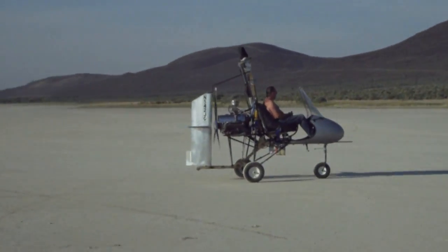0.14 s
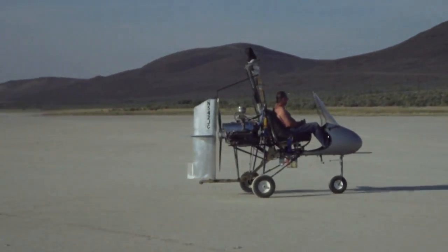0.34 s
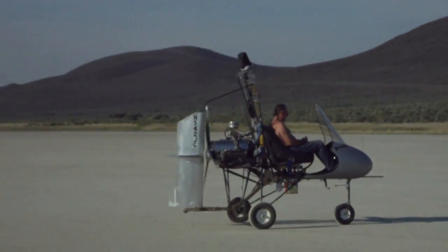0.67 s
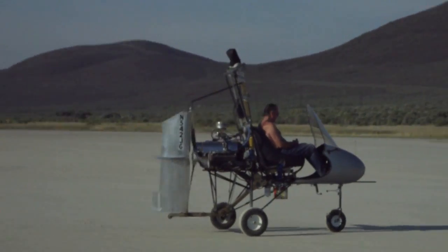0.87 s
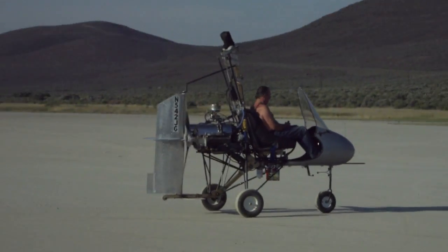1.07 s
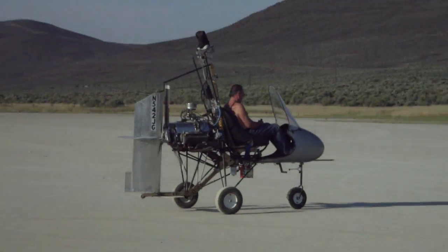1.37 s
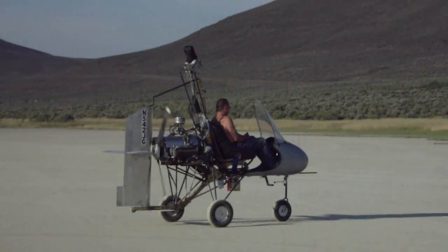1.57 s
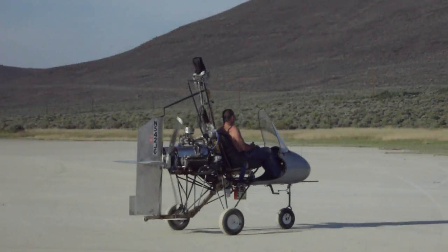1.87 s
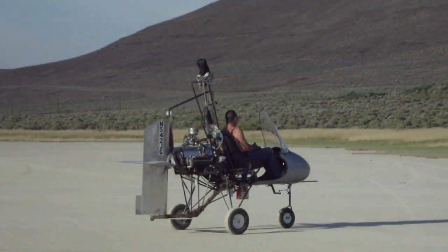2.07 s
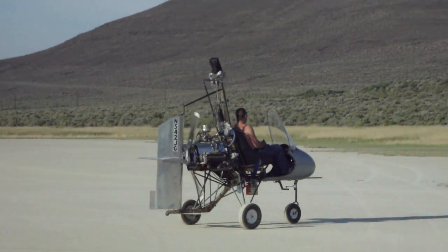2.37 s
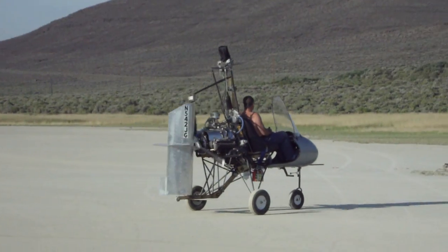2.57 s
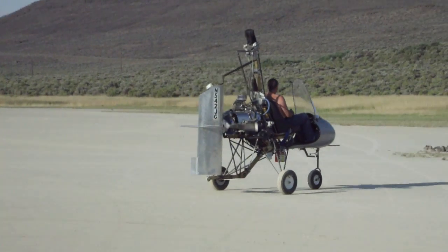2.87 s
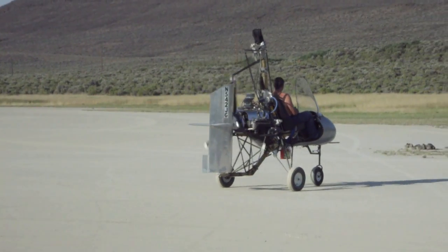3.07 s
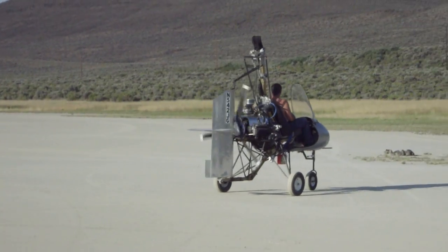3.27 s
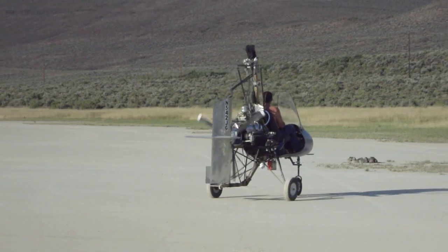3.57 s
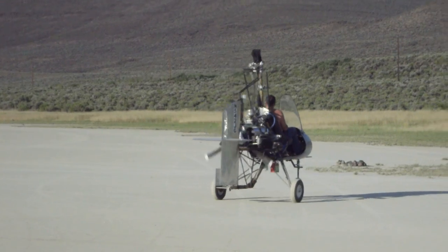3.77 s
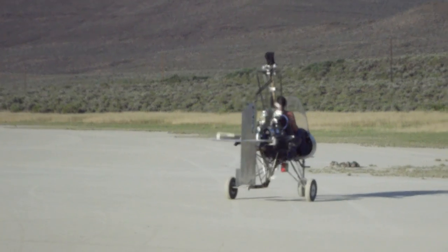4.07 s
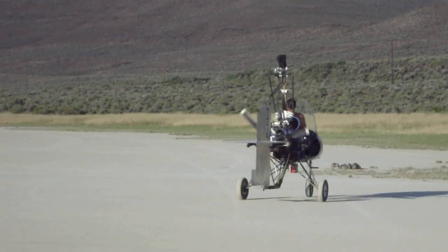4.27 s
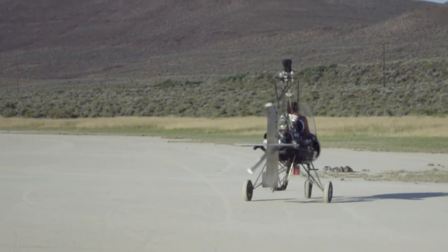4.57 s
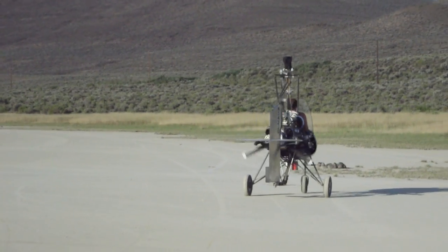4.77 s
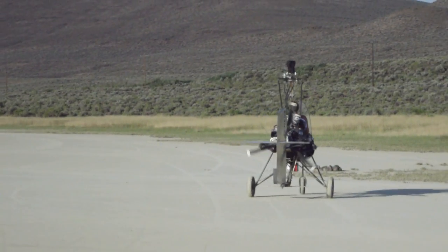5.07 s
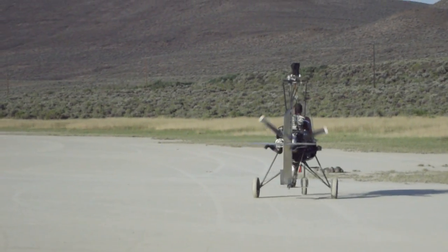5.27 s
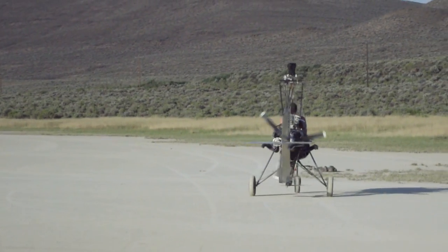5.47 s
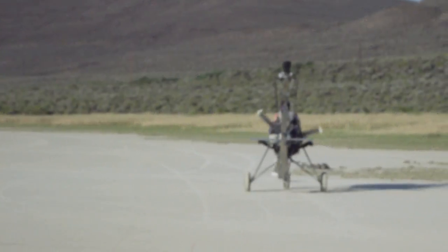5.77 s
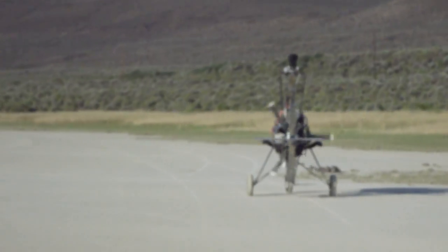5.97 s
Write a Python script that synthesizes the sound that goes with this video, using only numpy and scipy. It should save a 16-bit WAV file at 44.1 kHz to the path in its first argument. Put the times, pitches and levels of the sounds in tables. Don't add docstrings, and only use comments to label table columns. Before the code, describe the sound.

Harsh clattering propeller-engine burst with camera motor rasp, throttle cut to a stumbling putter, then smoother droning power and a final zoom whirr.

```python
import sys
import numpy as np
from scipy import signal
from scipy.fft import rfft, irfft
from scipy.io import wavfile
from scipy.ndimage import uniform_filter1d

SR = 44100
rng = np.random.default_rng(int(sys.argv[2]) if len(sys.argv) > 2 else 0)


def linear_from_db(decibels):
    return 10 ** (np.asarray(decibels, float) / 20)


def generate_wav(sig):
    pcm = np.round(np.clip(np.atleast_2d(sig).T, -1, 1) * 32767).astype(np.int16)
    wavfile.write(sys.argv[1], SR, pcm)


N = 270333
T = np.arange(N) / SR
HZ = np.arange(N // 2 + 1) * SR / N

# time [s], rate [Hz].
CYCLE_RATE = [(0.0, 23.17), (0.19, 26.89), (0.56, 32.87), (0.87, 34.33), (1.19, 33.98), (1.86, 31.08),
              (2.03, 25.77), (2.45, 19.34), (2.65, 17.96), (3.0, 17.38), (3.3, 18.25), (3.87, 18.6),
              (4.32, 17.9), (4.51, 17.91), (4.8, 20.36), (5.27, 22.08), (6.13, 22.33)]
# multiple of the cycle rate, level under power, idling, pulling away [dB].
EXHAUST_ORDERS = [(1, -30, -55, -57), (6, -23, -30, -25), (7, -26, -30, -46), (8, -24, -38, -29),
                  (9, -35, -37, -51), (10, -29, -44, -43), (11, -34, -49, -53), (12, -31, -43, -38),
                  (13, -36, -48, -51), (14, -38, -41, -38), (16, -38, -48, -42), (18, -38, -47, -42),
                  (20, -31, -49, -42), (22, -35, -48, -49), (24, -31, -48, -47), (26, -32, -54, -56),
                  (28, -33, -57, -55), (30, -34, -59, -53), (32, -37, -59, -55)]
# multiple of the cycle rate, level spooling up, under power, idling, pulling away [dB].
LUMPY_ORDERS = [
    (2, -21, -13, -34, -41),
    (3, -19, -13, -38.5, -41),
    (5, -42, -31, -24.5, -40),
]
# frequency [Hz], level [dB].
PIPE_RING = [(15, -22), (40, -7), (70, 2), (100, 4), (140, -5.5), (250, -32.0), (450, -10.5), (700, -56.0)]
# frequency [Hz], level [dB per Hz].
CRACK_COLOUR = [(120, -15.5), (200, -6), (270, -1.5), (297, -7), (335, -3.5), (503, -16.5), (799, -2.5),
                (1230, -12), (1770, -2.5), (2600, -24), (3380, -20.5), (5720, -120)]
# time [s], peak [dB], treble against the peak [dB].
STRONG_CHUFFS = [(2.1381, 2, -25), (2.2244, 3, -28), (2.3152, -1, -21), (2.4135, -0.5, -22),
                 (2.4644, 3, -15), (2.5158, -3.5, -11.5), (2.5706, -1.5, -23), (2.623, -3, -9.5),
                 (2.7333, -4.5, -14.5), (2.848, -5.5, -18.5), (2.9064, -3, -22.5), (3.0201, -6.5, -19),
                 (3.0755, -10.5, -13), (3.3539, -4, -16.5), (3.4082, -1.5, -14.5), (3.4641, -3.5, -15),
                 (3.5185, -1.5, -17), (3.5719, -7.5, -14), (3.6262, -7, -15), (3.8971, -9, -14),
                 (4.0608, -7, -16), (4.5077, -4.5, -23.5), (4.5596, -6.5, -16.5), (4.7158, -12, -4.5),
                 (4.8175, -13, -10), (4.8659, -13.5, -3), (4.9627, -2.5, -19), (5.0086, -4, -16),
                 (5.1498, -8, -16.5)]
# centre [Hz], width [Hz], level [dB], 1 if in the treble group.
CHUFF_BANDS = [(1730, 115, -6, 0), (2440, 240, 1, 0), (2984, 194, 4.5, 0), (3960, 640, -13.5, 0),
               (6430, 490, -14.5, 1), (7330, 410, -8.5, 1), (8540, 560, -5, 1), (9210, 610, -10, 1)]
# time [s], level [dB].
LEAK_LEVEL = [(0, -20), (.5, -22), (.8, -26), (1.84, -26.5), (1.95, -41.5), (2.3, -33), (2.8, -28),
              (4.2, -32), (5.0, -28), (5.15, -28.5), (5.6, -38.5), (6.13, -36.5)]
# frequency [Hz], level [dB per Hz].
HISS_COLOUR = [(88, -8), (150, 0.5), (214, -11.5), (396, -9.5), (554, -20.5), (733, -15.5), (1190, -20),
               (1610, -10), (3030, -8.5), (4090, -36), (5510, -32), (7290, -28), (8780, -21.5),
               (13000, -48)]
# frequency [Hz], level [dB].
PORT_DIFFERENCE = [(300, -48), (700, -28), (1400, -20), (2500, -19), (5000, -16), (9000, -14), (15000, -12)]
# frequency [Hz], lead [radians].
PORT_LEAD = [(1, 0), (1200, 0), (2000, 0.19), (3100, 0.42), (3900, -0.03), (5700, 1.1), (6600, -1.2),
             (9000, -1.1), (14000, -4.5)]
# frequency [Hz], level [dB per Hz].
WIND_COLOUR = [(10, -10), (25, -6), (45, -5.5), (80, -23), (200, -43)]
# start [s], end [s], rise [s], fall [s], level [dB].
ZOOM_MOTOR = [
    (-.1, .84, .01, .04, -21),
    (5.775, 6.3, .004, .04, -20.5),
]
# frequency [Hz], level [dB per Hz].
ZOOM_COLOUR = [(760, -20), (1300, -15.5), (1570, -8.5), (2210, -24), (2470, -0.5), (2800, 0.5),
               (3100, -6.5), (3530, -39), (4800, -23.5), (6000, -40), (7800, -64), (13200, -120)]
# time [s], peak [dB].
GEAR_KNOCKS = [
    (5.7728, -9),
    (5.7783, -5.5),
    (5.7837, -5),
]
# start [s], length [s], pitch [Hz], level [dB], third harmonic [dB].
FOCUS_WHINES = [
    (.36, .13, 2650, -29, -50),
    (4.02, .13, 2645, -30, -52),
    (5.622, .065, 2652, -31, -44),
]
# frequency [Hz], level [dB], lead of the right side [radians], flutter [dB].
WHISTLES = [
    (7436, -46.5, 1.0, .5),
    (14874, -46, 2.15, 2.2),
]
# frequency [Hz], level [dB].
AMPLIFIER_COLOUR = [(3000, -28), (9000, -1), (13000, -6), (14500, -4), (15500, -24)]

SPOOL_S, CUT_S, CUT_FADE_S, PULL_S, PULL_RISE_S = 0.35, 1.83, .2, 4.5, 0.34
RUMBLE_DB = (-28, -34.5, -34.5, -34)
CRACK_DB = (-20, -13.5, -26, -21.5)
HISS_DB = (-18.5, -18, -26.5, -26)
SECOND_DB = (-1.5, -3, -9, -3.5)
BARK_DB = (-15, -0.5, -6.5, -4)
PLACE = (0.403, 0.31, 0.48, 0.52)


def curves(table):
    s, *columns = np.transpose(table)
    return [np.interp(T, s, c) for c in columns]


def shape(points):
    hz, db = np.transpose(points)
    return linear_from_db(np.interp(np.log(HZ + 1), np.log(hz), db))


def colour(x, points):
    y = irfft(rfft(x) * shape(points), N)
    return y / np.sqrt(np.mean(y ** 2))


def air():
    mid, side = rng.standard_normal((2, N))
    side = irfft(rfft(side) * shape(PORT_DIFFERENCE), N)
    return np.array([mid + side, mid - side])


def walk(rate):
    k = int(SR / rate)
    held = np.repeat(rng.standard_normal(N // k + 1), k)
    return 1.26 * uniform_filter1d(uniform_filter1d(held, k), k)[:N]


def steady(gate):
    return gate / np.sqrt(uniform_filter1d(gate ** 2, size=SR // 4) + 1e-9)


def ramp(start, end, rise_s, fall_s):
    return np.clip(np.minimum((T - start) / rise_s, (end - T) / fall_s), 0, 1)


def throttle(fade_s, lag_s=0.):
    opened = np.exp(-np.maximum(T - CUT_S - lag_s, 0) / fade_s)
    spool = np.exp(-(T / SPOOL_S) ** 2)
    pull = (1 - opened) * np.clip((T - PULL_S) / PULL_RISE_S, 0, 1)
    return np.array([spool * opened, (1 - spool) * opened, 1 - opened - pull, pull])


def by_state(values, fade_s=CUT_FADE_S, lag_s=0.):
    return np.asarray(values, float) @ throttle(fade_s, lag_s)


def exhaust(cycle, power, pull, bark_db):
    idle = np.clip(1 - power - pull, 0, 1)
    low, rumble_db = low_orders(np.gradient(cycle) * SR)
    thump = .59 * idle + .615 * pull + .46 * power
    waver = .04 + .14 * idle
    out = 0
    for k, gain in enumerate(low, 2):
        phase = 2 * np.pi * k * (cycle - thump) + waver * walk(12)
        out = out + gain * (1 + waver * walk(15)) * np.cos(phase)
    start = np.where(power > .5, .035, .6 + .038 * pull)
    for k, power_db, idle_db, pull_db in EXHAUST_ORDERS:
        k = round(k)
        sign = -1 if k == 6 else 1
        gain = power * linear_from_db(power_db + bark_db * min(k / 20, 1))
        gain = gain + sign * idle * linear_from_db(idle_db) + pull * linear_from_db(pull_db)
        drift = (waver + .012 * k) * walk(10)
        phase = 2 * np.pi * k * (cycle - start) + drift
        out = out + gain * (1 + 2 * waver * walk(12)) * np.cos(phase)
    firing = np.floor(4 * cycle - .4).astype(int) + 1
    kicks = np.diff(firing, prepend=0) * rng.standard_normal(2000)[firing]
    rumble = colour(kicks + 0.0027 * rng.standard_normal(N), PIPE_RING)
    return np.sqrt(2) * out + linear_from_db(rumble_db + 2.5) * rumble


def low_orders(hz):
    shares = throttle(0.062)
    second, third, fifth = (linear_from_db(np.array(row[1:])) @ shares for row in LUMPY_ORDERS)
    fifth = fifth * linear_from_db(-2.5 * (T - 3.0) * shares[2])
    pipe_hz, pipe_width_hz, pipe_db, floor_db = 90.2, 8.1, -17.5, -33
    fourth = linear_from_db(np.maximum(pipe_db - ((4 * hz - pipe_hz) / pipe_width_hz) ** 2, floor_db))
    missed_s, missed_width_s, missed_db = 2.36, 0.058, -10
    fourth = fourth * linear_from_db(missed_db * np.exp(-((T - missed_s) / missed_width_s) ** 2))
    stumble_end_s, edge_s, misfire_db = 2.85, .08, -29
    stumble = ramp(CUT_S, stumble_end_s, edge_s, edge_s)
    rumble_db = (1 - stumble) * by_state(RUMBLE_DB) + stumble * misfire_db
    return (second, third, fourth, fifth), rumble_db


def valves(cycle, hz, power, crack_db, bark_db):
    turns = 4 * cycle - .12 - .42 * (1 - power)
    gate, k = bursts(turns, 0.00045, 0.0033, 4 * hz)
    scatter_db = 1.6 * rng.standard_normal(2000)
    size = linear_from_db(scatter_db + np.tile([1.8, 1.4, 1.0, -1.8], 500))[k]
    clatter = 0.44 * linear_from_db(3.6 * walk(40))
    spit = colour(air() * steady(gate * size + clatter), CRACK_COLOUR)
    cylinder = linear_from_db(np.tile([-0.5, -9.5, -1.0, -7.5], 500))[k]
    beats = steady(np.diff(k, prepend=k[0]) * size * cylinder)
    rattle = rng.standard_normal(300) * np.exp(-T[:300] / .0015)
    click = colour(signal.fftconvolve(beats, rattle)[:N], CRACK_COLOUR)
    return linear_from_db(crack_db - 3.5) * (.8 * spit + linear_from_db(bark_db - 1) * click)


def bursts(turns, rise_s, fall_s, hz):
    since = turns % 1 / hz
    envelope = (1 - np.exp(-(since / rise_s) ** 2)) * np.exp(-since / fall_s)
    return envelope, np.floor(turns).astype(int) + 2


def chuffs(cycle, hz, power, place, second_db, chuff_db):
    s, peak_db, treble_db = np.transpose(STRONG_CHUFFS)
    first, k = puff(cycle - place - .05, hz, 0.0026, 0.0074)
    second, j = puff(cycle - place - .57 - .09 * power, hz, .002, .0045)
    loud = k[(s * SR).astype(int) + 130]
    strength_db = 2.2 * rng.standard_normal((400, 4)).T
    strength_db[0, loud] = peak_db + 10.5
    strength_db[1, loud] = peak_db + treble_db + 26.0
    out = 0
    for centre_hz, width_hz, db, group in CHUFF_BANDS:
        group = int(round(group))
        tint = linear_from_db(3.6 * rng.standard_normal((400, 2)).T)
        main = first * linear_from_db(strength_db[group, k])
        late = second * linear_from_db(second_db + strength_db[2 + group, j])
        scale = np.sqrt(uniform_filter1d((main + late) ** 2, size=SR // 4))
        gate = (main * tint[0, k] + late * tint[1, j]) / scale + 0.044 * group + 0.18 * power
        bell = np.exp(-((HZ - centre_hz) / width_hz) ** 2 / 2)
        band = irfft(rfft(air() * gate) * bell, N) * np.sqrt(SR / 4 / width_hz)
        load_db = power * (1 - group) * (8.5 - 4.15 * centre_hz / 1000)
        out = out + linear_from_db(db + load_db) * band
    return linear_from_db(chuff_db) * out


def puff(turns, hz, rise_s, fall_s):
    since = ((turns + .5) % 1 - .5) / hz
    envelope = np.exp(-(since / np.where(since < 0, rise_s, fall_s)) ** 2)
    return envelope, np.floor(turns + .5).astype(int) + 2


def propeller(hiss_db):
    return linear_from_db(hiss_db - 0.5 + 0.99 * walk(25.12)) * colour(air(), HISS_COLOUR)


def at_ports(craft):
    lead = np.interp(HZ, *np.transpose(PORT_LEAD))
    return irfft(rfft(craft) * np.exp(1j * lead / 2 * np.array([[1], [-1]])), N)


def wind():
    return linear_from_db(-34.5 + 1.0 * walk(5.1)) * colour(rng.standard_normal(N), WIND_COLOUR)


def zoom_motor():
    run = sum(linear_from_db(db) * ramp(start, end, rise, fall) for start, end, rise, fall, db in ZOOM_MOTOR)
    rasp = run * linear_from_db(1.1 * walk(160))
    for start, db in GEAR_KNOCKS:
        rasp = rasp + linear_from_db(db - 3.5) * np.exp(-((T - start - .001) / 0.0014) ** 2)
    return colour(air() * rasp, ZOOM_COLOUR) * np.sqrt(np.mean(rasp ** 2))


def focus_motor():
    out = 0
    for start, length, hz, db, third_db in FOCUS_WHINES:
        on = ramp(start, start + length, 0.0026, 0.0026)
        turn = 2 * np.pi * hz * (T - start) * (1 - 0.0067 * (T - start))
        tone = linear_from_db(db) * np.sin(turn) + linear_from_db(third_db) * np.sin(3 * turn)
        out = out + on * np.sqrt(2) * tone
    return out


def electronics():
    out = linear_from_db(-51.5) * colour(rng.standard_normal((2, N)), AMPLIFIER_COLOUR)
    for hz, db, lead, flutter_db in WHISTLES:
        turn = 2 * np.pi * hz * T + flutter_db * .2 * walk(70) + np.array([[-lead], [lead]]) / 2
        flutter = 1.6 * flutter_db * np.sin(2 * np.pi * 28.0 * T + 1.5 * walk(25))
        out = out + np.sqrt(2) * linear_from_db(db + 4.5 + flutter) * np.sin(turn)
    return out


def scene():
    hz = curves(CYCLE_RATE)[0]
    cycle = np.cumsum(hz) / SR
    spool, loaded, _, pull = throttle(CUT_FADE_S, .05)
    power = spool + loaded
    bark_db = by_state(BARK_DB)
    crack_db = by_state(CRACK_DB, fade_s=0.24, lag_s=0.13)
    craft = valves(cycle, hz, power, crack_db, bark_db)
    craft = craft + chuffs(cycle, hz, power, by_state(PLACE), by_state(SECOND_DB), curves(LEAK_LEVEL)[0])
    craft = craft + propeller(by_state(HISS_DB))
    camera = zoom_motor() + focus_motor() + electronics()
    return exhaust(cycle, power, pull, bark_db) + at_ports(craft) + wind() + camera


def band_limit(x):
    return signal.sosfilt(signal.butter(12, 15200, fs=SR, output="sos"), x)


def record(dry):
    top_hz, offset = 15150, -0.019
    cut = signal.sosfilt(signal.ellip(8, .2, 60, top_hz, fs=SR, output="sos"), dry)
    mix = np.clip(cut + offset, -1, 1)
    return band_limit(mix)


dry = scene()
out = record(dry)
generate_wav(out)
```